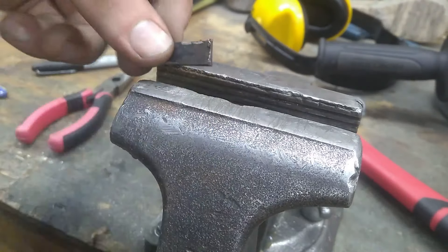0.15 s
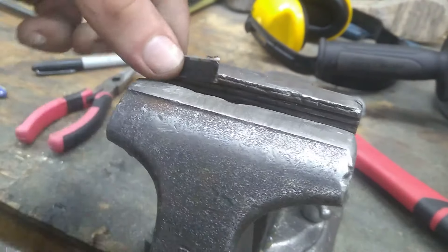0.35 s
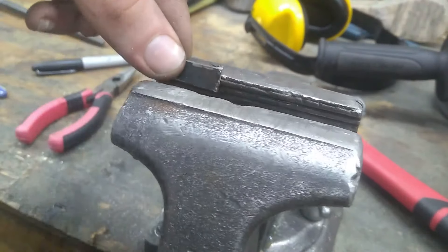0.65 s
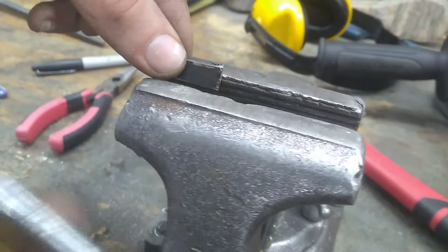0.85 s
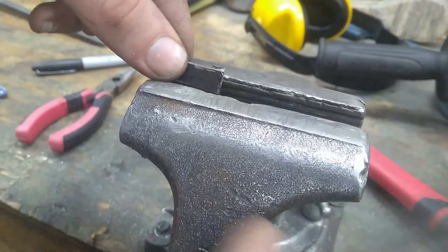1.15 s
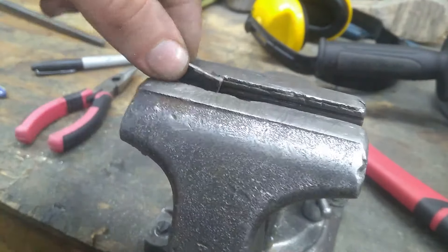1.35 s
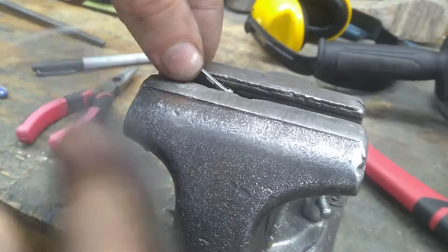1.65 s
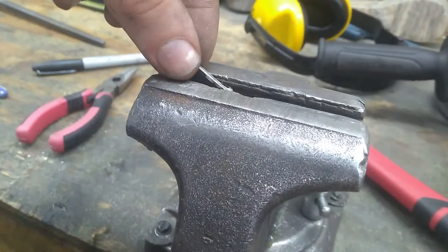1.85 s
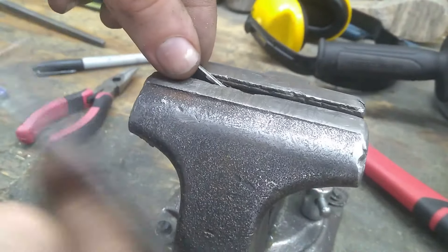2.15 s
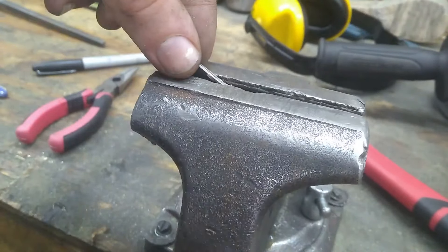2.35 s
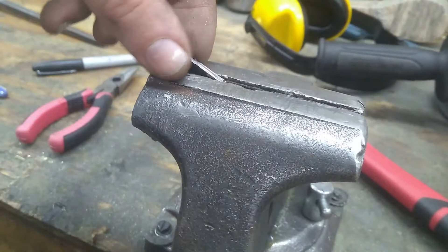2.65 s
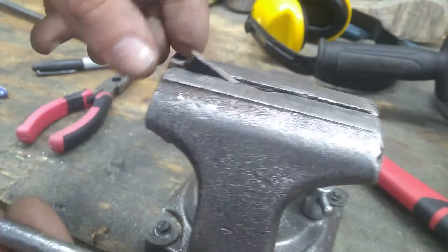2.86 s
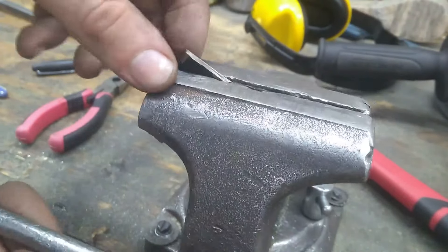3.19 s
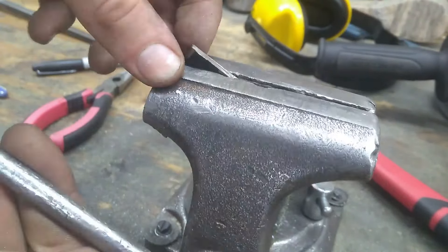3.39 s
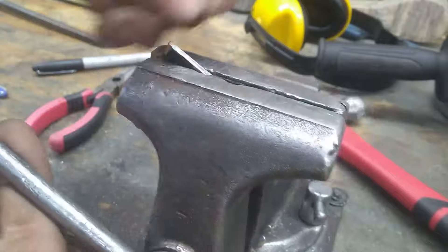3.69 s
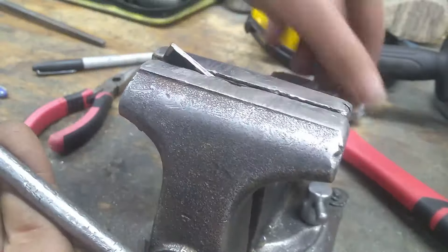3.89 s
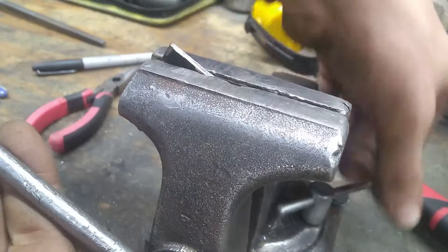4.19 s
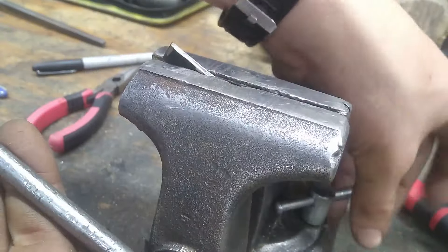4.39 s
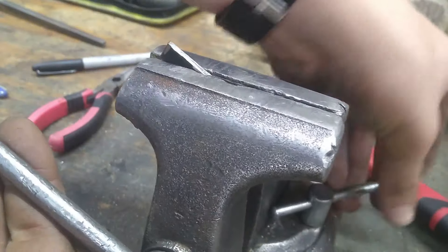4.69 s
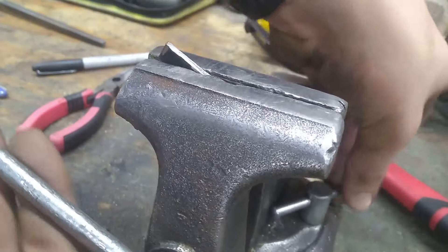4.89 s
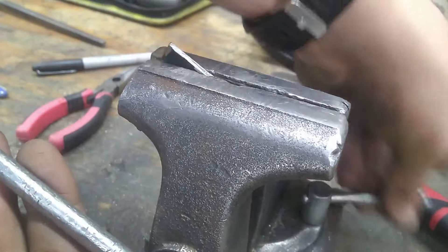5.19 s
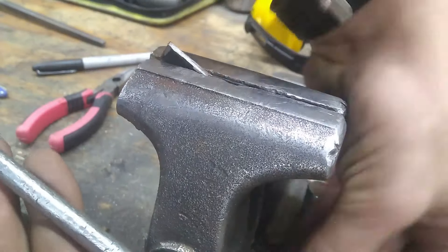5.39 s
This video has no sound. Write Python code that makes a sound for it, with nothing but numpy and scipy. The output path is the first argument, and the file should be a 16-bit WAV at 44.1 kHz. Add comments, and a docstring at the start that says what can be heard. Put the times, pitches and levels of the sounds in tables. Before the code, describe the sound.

Close, uneven iron clacks and gritty grinding as a bench vise tightens, followed by lighter steel clinks and one hard knock.

```python
"""Closing a bench vise

A cast-iron vise is spun shut on a small steel plate, close by in a workshop. The sliding handle drops
against its stops and the wooden bench booms; the screw grinds and sings in its nut. Then a hand works
the small swivel-lock lever, which scrapes and clinks. The hardest blows overload the microphone."""
import sys
import numpy as np
from scipy import signal
from scipy.io import wavfile
from scipy.ndimage import uniform_filter1d

SR = 44100
rng = np.random.default_rng(int(sys.argv[2]) if len(sys.argv) > 2 else 0)


def pcm_store(signal):
    """Save signal as 16-bit PCM."""
    levels = np.round(np.clip(np.atleast_2d(signal), -1, 1) * 32767)
    wavfile.write(sys.argv[1], SR, levels.astype(np.int16).T)


N = 244314


# Handle and jaw hits. Each row: start in seconds, clack level in dB, brightness in Hz,
# bench boom level in dB, steel ring level in dB.
KNOCKS = [(0.428, -14.5, 594, -67, -29), (0.471, -2.5, 640, -37, -33), (0.589, -20.5, 400, -51, -52),
          (0.648, -5, 477, -34, -54), (0.835, -10.5, 437, -36, -51), (0.867, 5.5, 610, -19.5, -49),
          (0.881, 3.5, 490, -30, -32), (1.02, 3.5, 944, -26, -11), (1.522, -2, 570, -26, -38),
          (1.589, -3.5, 576, -28, -38), (1.82, -6, 546, -54, -40), (1.971, 5.5, 680, -44, -14),
          (2.179, -8.5, 397, -32, -35), (2.668, -4.5, 536, -24.5, -47), (2.694, -8.5, 450, -45, -54.5),
          (2.722, -9.5, 410, -44, -59), (2.859, 5.5, 893, -19.5, -19), (2.931, -19, 475, -31.5, -73),
          (3.02, -1.5, 515, -18.5, -35), (3.236, -12, 463, -31.5, -65), (3.282, -6.5, 630, -23, -45.5),
          (3.399, 0, 650, -13, -28), (3.778, 3.5, 480, -10.5, -12.5), (3.81, 14.5, 660, -33, -5.5),
          (3.895, -5.5, 604, -57, -65), (5.003, -16, 428, -27.5, -45.5), (5.124, 0.5, 382, -58, -35),
          (5.294, -12.5, 360, -36.5, -43), (5.447, -14.5, 350, -63, -33.5), (5.48, -6, 404, -36, -38),
          (5.522, 6.5, 310, -17, -18), (5.535, -18, 495, -21, -17)]
# Tone of iron clack, wooden boom and steel rasp. Each row: frequency in Hz, level in dB.
KNOCK_COLOUR = [(30, -41), (90, -30), (160, -12.5), (250, -5.5), (400, 2.5), (560, 5.5), (820, -0.5),
                (1250, -2), (1600, -10), (2100, -48), (3000, -49.5)]
BOOM_COLOUR = [(40, -19.5), (80, -21.5), (115, 0), (160, -17), (240, -0.5), (320, -4), (560, -11),
               (850, -17.5), (1300, -22), (2000, -37.5)]
RASP_COLOUR = [(1900, 9.5), (2450, -2.5), (2900, 3.5), (4200, 1.5), (6000, -8), (7500, -26), (10000, -24),
               (14000, -46.5)]
# Bench and handle resonances. Each row: pitch in Hz, width in Hz, gain in dB.
BENCH_MODES = [(107, 65, 5), (220, 63, -9.5)]
HANDLE_MODES = [(2670, 90, 18), (3340, 45, 3.2), (3590, 52, 10), (5367, 380, 8.2)]

def knocks():
    """Heavy hits clack in the casting, boom through the bench and ring the handle."""
    iron, wood, steel = np.zeros((3, 2, N))
    for s, clack_db, bright_hz, boom_db, ring_db in KNOCKS:
        hardness = np.log2(bright_hz / 650)   # a shorter contact is brighter
        clack = dense_ring(KNOCK_COLOUR, crack_t60=0.052, tail_db=-17, tilt_db=9.3 * hardness,
                           rise_s=0.00075)
        boom = dense_ring(BOOM_COLOUR, crack_t60=0.18, tail_db=-28.5, rise_s=0.0017)
        ring = dense_ring(RASP_COLOUR, crack_t60=0.12, tail_db=-10, tilt_db=-1, rise_s=0.0014)
        add(iron, s - 0.0015, from_db(clack_db - 9.5) * clack)   # early, to offset the low-pass delay
        add(wood, s + 0.00333, from_db(boom_db) * boom)
        add(steel, s, from_db(ring_db - 9.5) * ring)
    bench = cut(wood + resonances(wood, BENCH_MODES), hz=1860, kind="low", order=6)
    handle = cut(steel + resonances(steel, HANDLE_MODES), hz=13400, kind="low", order=4)
    return casting(iron) + bench + handle


# Resonances of the iron body. Each row: pitch in Hz, width in Hz, gain in dB.
CASTING_MODES = [(328.2, 36, 2.5), (401, 21, -7.5), (548, 67, -1), (689.7, 9.8, -4.5), (1168, 140, -1.5),
                 (1470, 52, -1), (1924, 80, 7.5)]

def casting(hits):
    """The cast-iron body rings at its modes and damps the treble."""
    return cut(hits + resonances(hits, CASTING_MODES), hz=1691, kind="low", order=8)


# Light steel hits. Each row: start in seconds, level in dB, brightness in Hz, casting level in dB.
CLINKS = [(0.41, -22, 3630, -30.5), (0.679, -22, 6660, -14.5), (2.4055, -27, 4420, -22),
          (3.0246, -27, 2800, -38), (3.809, -10, 4460, -28), (4.099, -7, 3930, -22),
          (4.2464, -22, 3000, -29), (4.265, -20, 3335, -32.5), (4.277, -19, 4700, -29),
          (4.2842, -1, 3650, -12), (4.3016, 5.5, 4000, -8.5), (4.3312, -7, 3700, -18),
          (4.4039, -12.5, 3450, -20.5), (4.45, -23, 3340, -37), (4.6043, -39.5, 3210, -34.5),
          (4.6432, -13, 3440, -21), (5.0973, -29.5, 3080, -23.5), (5.2187, -8.5, 3330, -20.5),
          (5.397, -8, 2960, -12.5), (5.5184, -19, 2900, -1.5)]
# Tone of struck steel. Each row: frequency in Hz, level in dB.
STEEL_COLOUR = [(1200, -10.5), (1900, 7.5), (2300, 3), (3300, 7.5), (4200, 0), (5200, 3.5), (7700, -8),
                (9500, -26), (11500, -23.5), (14000, -44)]
# Lock lever resonances. Each row: pitch in Hz, width in Hz, gain in dB.
LEVER_MODES = [(949, 60, 26.5), (3260, 20, -10.5), (3400, 78, -0.5), (3516, 250, 2.5), (4080, 42, -7.5),
               (5130, 81, -4), (5110, 160, 4.5), (5680, 79, 7), (7620, 130, 12), (11070, 70, 14.5)]

def clinks():
    """Light hits ring the lever, and the casting answers underneath."""
    steel, iron = np.zeros((2, 2, N))
    for s, clink_db, bright_hz, answer_db in CLINKS:
        hardness = np.log2(bright_hz / 3700)
        clink = dense_ring(STEEL_COLOUR, crack_t60=0.042, tail_db=-18, tilt_db=25.4 * hardness,
                           rise_s=0.0015)
        answer = dense_ring(KNOCK_COLOUR, crack_t60=0.14, tail_db=-17.5, tilt_db=1, rise_s=0.00088)
        add(steel, s, from_db(clink_db - 15) * clink)
        add(iron, s, from_db(answer_db - 12) * answer)
    lever = cut(steel + resonances(steel, LEVER_MODES), hz=13400, kind="low", order=4)
    return lever + casting(iron)


# Effort on the screw, one curve per spin. Each point: time in seconds, grind level in dB.
SPINS = [
    [(0.67, -23.5), (0.8, -20), (0.86, -35), (1.01, -28)],
    [(1.235, -50), (1.37, -27.5), (1.5, -23.5), (1.575, -32.5), (1.66, -25), (1.8, -20.5), (1.95, -14),
     (2.04, -26.5), (2.24, -26.5), (2.42, -20.5), (2.54, -25), (2.77, -38)],
]
# Dry spots on the thread. Each row: peak time in seconds, then grind, rasp and grit levels in dB.
CATCHES = [(0.7, -30, -30.5, -31.5), (0.79, -38, -45, -33), (0.922, -11, -38.5, -32),
           (1.407, -11, -23.5, -34), (1.752, -22.5, -29, -49), (1.799, -16, -35, -36),
           (1.825, -17.5, -22.5, -26), (1.931, -25.5, -35.5, -41.5), (2.327, -19, -46.5, -57),
           (2.586, -20, -48, -41.5)]

def screw():
    """The thread grinds, rasps and sings with the effort; where it catches, grit cracks."""
    t = np.arange(N) / SR
    usual_db = -23.5   # the grind level that counts as an effort of 1
    effort = sum(from_db(np.interp(t, *np.transpose(spin)) - usual_db)
                 * (t >= spin[0][0]) * (t <= spin[-1][0]) for spin in SPINS)
    catch_grind, catch_rasp, crush = np.zeros((3, N))
    for s, grind_db, rasp_db, grit_db in CATCHES:
        catch = swell(s, build_s=0.01, ease_s=0.011)
        catch_grind += from_db(grind_db) * catch
        catch_rasp += from_db(rasp_db) * catch
        crush += from_db(grit_db) * swell(s, build_s=0.004, ease_s=0.011)
    song = effort ** 2 / (effort ** 2 + from_db(-5.5) ** 2)   # sets in with effort, then levels off
    rasp = rasping(catch_rasp + from_db(-51.5) * effort ** 1.1)
    whistle = singing(from_db(-28) * catch_rasp + from_db(-52) * song)
    grind = grinding(catch_grind + from_db(usual_db) * effort, turns=4)
    return from_db(1.5) * grind + rasp + whistle + grit(crush, cracks_per_s=720)


# Tone of rubbed iron. Each row: frequency in Hz, level in dB.
GRIND_COLOUR = [(30, -34.5), (75, -30.5), (120, -6.5), (200, -8), (310, -4), (410, 1), (550, -4.5),
                (820, -8), (1200, -13.5), (1600, -23.5), (2100, -22), (3000, -44.5)]

def grinding(gain, turns):
    """Several turns of the thread bear at once, each shaking the casting from its own spot."""
    shake = 0
    for _ in range(turns):
        ring = dense_ring(GRIND_COLOUR, crack_t60=0.015, tail_db=-27.5)
        shake += friction(gain, ring, CASTING_MODES, slips_per_s=200, uneven_db=3.5,
                          judder_db=2.5, judder_hz=25.08, wander_db=1.5)
    return cut(shake / np.sqrt(turns), hz=1772, kind="low", order=6)


# Thread resonances. Each row: pitch in Hz, width in Hz, gain in dB.
THREAD_MODES = [(2700, 90, 12), (2920, 70, 8), (3600, 110, 12), (5240, 110, 9), (5650, 110, 10),
                (6250, 140, 11)]

def rasping(gain):
    """Fast slips excite the thread's own bright, shifting modes."""
    ring = dense_ring(RASP_COLOUR, crack_t60=0.0092, tail_db=-21.5)
    rasp = friction(gain, ring, THREAD_MODES, slips_per_s=900, uneven_db=3,
                    judder_db=2.5, judder_hz=40.3, wander_db=3)
    return rasp + gliding_mode(rasp, hz=4290, width_hz=170, db=12, swing_hz=130)


# Partials of the screw's whistle. Each row: pitch in Hz, width in Hz, gain in dB.
WHISTLE_MODES = [(8130, 30, 0), (11750, 160, -25), (13850, 180, -32)]

def singing(gain):
    """The screw sings in its nut: a thin, fluttering whistle."""
    whistle = rms_one(resonances(rng.standard_normal((2, N)), WHISTLE_MODES))
    flutter = from_db(4 * drift(rate_hz=40))
    return gain * rms_one(cut(whistle, hz=7300, kind="high", order=8) * flutter)


def grit(gain, cracks_per_s):
    """Grains crushed in the thread give bright cracks of uneven size."""
    cracks = rms_one(impulses(cracks_per_s, uneven_db=1, cap=3))
    ring = dense_ring(STEEL_COLOUR, crack_t60=0.0065, tail_db=-26.5, tilt_db=5)
    return signal.oaconvolve([gain * cracks], ring / np.sqrt(np.sum(ring ** 2) / 2), axes=1)[:, :N]


# Steel sliding on steel. Each row: peak time in seconds, run-up in seconds, rub and hiss levels in dB.
SLIDES = [(3.765, 0.015, -24.5, -43.5), (3.931, 0.041, -46, -32), (4.078, 0.02, -20.5, -29),
          (4.318, 0.016, -18, -31), (5.225, 0.013, -15.5, -34), (5.28, 0.018, -35, -26),
          (5.334, 0.012, -22, -38.5), (5.414, 0.0068, -23.5, -37.5), (5.537, 0.015, -5.5, -26.5)]
# Tone of the scrape. Each row: frequency in Hz, level in dB.
HISS_COLOUR = [(1200, -4.5), (1900, -1), (3200, 1.5), (4500, 3), (6500, -5), (8000, -21.5), (10000, -29),
               (12700, -12.5), (14000, -35)]
# Swivel resonance. Each row: pitch in Hz, width in Hz, gain in dB.
SWIVEL_MODES = [(897, 140, 4)]

def slides():
    """Handle and lever slide in their holes: a low rub under a fine, bright scrape."""
    rub_gain, hiss_gain = sum(np.outer(from_db(levels_db), swell(s, run_up_s, ease_s=0.023))
                              for s, run_up_s, *levels_db in SLIDES)
    iron = dense_ring(GRIND_COLOUR, crack_t60=0.039, tail_db=-23.5, tilt_db=5.5)
    rub = friction(rub_gain, iron, CASTING_MODES + SWIVEL_MODES, slips_per_s=1100, uneven_db=4,
                   judder_db=3, judder_hz=28.73, wander_db=14)
    steel = dense_ring(HISS_COLOUR, crack_t60=0.01, tail_db=-41)
    hiss = friction(hiss_gain, steel, LEVER_MODES, slips_per_s=5300, uneven_db=-2,
                    judder_db=2, judder_hz=30, wander_db=7.5)
    return from_db(-0.5) * rub + from_db(-1.8) * cut(hiss, hz=13300, kind="low", order=8)


# Soft bumps of the plate. Each row: start in seconds, level in dB.
NUDGES = [(0.049, -38), (0.167, -41), (1.308, -7), (2.789, -15.5), (2.834, -12), (3.008, -9), (3.37, -9),
          (3.608, -33), (3.968, -29), (4.822, -35), (5.052, -17.5)]

def nudges():
    """The plate is nudged and thuds dully through the casting."""
    iron = np.zeros((2, N))
    for s, level_db in NUDGES:
        thud = dense_ring(GRIND_COLOUR, crack_t60=0.22, tail_db=-20, rise_s=0.00098)
        add(iron, s, from_db(level_db - 18) * thud)
    return casting(iron)


# Plate and handle tinks. Each row: start in seconds, peak in dB, pitch in Hz, width in Hz.
TINKS = [(1.647, -31, 3650, 45), (2.872, -29, 3570, 80), (3.399, -22.5, 5260, 200), (3.402, -39, 3380, 11),
         (3.725, -28.5, 3690, 89)]

def tinks():
    """Lightly touched steel chatters for an instant and rings around one pitch."""
    out = np.zeros((2, N))
    for s, peak_db, hz, width_hz in TINKS:
        touch = dense_ring(STEEL_COLOUR, crack_t60=0.019, tail_db=-16.5)
        ring = touch + resonances(touch, [(hz, width_hz, 26)])
        add(out, s, from_db(peak_db) * ring / np.abs(ring).max())
    return out


def mic_hiss():
    """The microphone's faint, even hiss."""
    return from_db(-62) * rms_one(cut(rng.standard_normal((2, N)), hz=4760, kind="low", order=1))


# Tail of vise, bench and workshop. Each row: frequency in Hz, seconds to fall 60 dB.
RING_OUT = [(100, 0.91), (250, 0.26), (560, 0.26), (1400, 0.26), (3500, 0.23), (10000, 0.24)]
# Stereo width. Each row: frequency in Hz, side minus mid in dB.
WIDTH = [(60, 9.5), (125, -3.5), (280, 0), (550, -5), (1250, -21.5), (1600, -1), (2000, 10), (2500, 12.5),
         (3200, -7.5), (4500, 9), (8000, -10), (13000, -0.5)]
# Stereo balance. Each row: frequency in Hz, left minus right in dB.
PAN = [(120, -2.5), (250, 2.5), (420, 4), (600, 2), (1100, 0.5), (1800, 0.5), (3300, -0.5), (5500, 0.5),
       (9000, -10.5), (13000, -2.5)]
BAND_HZ = 31.25 * 2 ** (np.arange(28) / 3)   # third octaves
BANK = [signal.butter(2, [hz / 2 ** (1 / 6), hz * 2 ** (1 / 6)], "band", fs=SR, output="sos")
        for hz in BAND_HZ]

def dense_ring(colour, crack_t60, tail_db, tilt_db=0, rise_s=0.00047):
    """Countless close modes struck at once: a crack, then a tail per band; tilt in dB per octave."""
    age = np.arange(SR // 3) / SR
    left_right = np.array([[1], [-1]])
    attack = 1 - np.exp(-(age / rise_s) ** 2)   # the contact takes a moment to build
    noise = rng.standard_normal((2, 2, len(age))) * attack
    crack = np.exp(-np.log(1000) * age / crack_t60)
    out = 0
    for k, hz in enumerate(BAND_HZ):
        if colour[0][0] <= hz <= colour[-1][0]:
            tail = from_db(tail_db) * np.exp(-np.log(1000) * age / at_hz(RING_OUT, hz))
            mid, side = signal.sosfilt(BANK[k], noise[k % 2] * (crack + tail))
            band = rms_one(rms_one(mid) + from_db(at_hz(WIDTH, hz)) * rms_one(side) * left_right)
            band *= from_db(at_hz(PAN, hz) / 2 * left_right)
            out += band * np.sqrt(hz) * from_db(at_hz(colour, hz) + tilt_db * np.log2(hz))
    return out / np.sqrt(np.sum(out ** 2) / (2 * SR * 0.01))   # the energy of 10 ms at unit power


WANDER_HZ = 4.7   # how fast a rubbing contact moves from spot to spot

def friction(gain, ring, modes, slips_per_s, uneven_db, judder_db, judder_hz, wander_db):
    """Tiny slips, bunched by judder, strike one body; its modes flare and fade as the contact moves."""
    slips = impulses(slips_per_s, uneven_db, cap=4)
    slips = rms_one(slips * from_db(judder_db * drift(judder_hz)))
    body = ring + resonances(ring, modes)
    shake = signal.oaconvolve([gain * slips], ring / np.sqrt(np.sum(body ** 2) / 2), axes=1)[:, :N]
    flares = (resonances(shake * rms_one(from_db(wander_db * drift(WANDER_HZ))), [m]) for m in modes)
    return shake + sum(flares)


def impulses(per_s, uneven_db, cap):
    """Random clicks whose sizes span cap times uneven_db."""
    sizes = from_db(uneven_db * np.minimum(rng.exponential(1, N), cap)) * rng.choice([-1, 1], N)
    return sizes * (rng.random(N) < per_s / SR)


def resonances(x, modes):
    """Ring x through parallel resonators."""
    out = 0
    for hz, width_hz, db in modes:
        r = np.exp(-np.pi * width_hz / SR)
        poles = [1, -2 * r * np.cos(2 * np.pi * hz / SR), r * r]
        out += from_db(db) * (1 - r * r) / 2 * signal.lfilter([1, 0, -1], poles, x + 1e-18)
    return out


def gliding_mode(x, hz, width_hz, db, swing_hz):
    """A resonance whose centre wanders as the contact moves."""
    turn = np.exp(2j * np.pi * np.cumsum(hz + swing_hz * drift(WANDER_HZ)) / SR)
    r = np.exp(-np.pi * width_hz / SR)
    return from_db(db) * 2 * np.real(turn * signal.lfilter([1 - r], [1, -r], x / turn + 1e-18))


def swell(s, build_s, ease_s):
    """Friction builds exponentially to a peak at time s and eases off."""
    t = np.arange(N) / SR - s
    return np.exp(-np.minimum(np.maximum(-t / build_s, t / ease_s), 20))


def drift(rate_hz):
    """Smooth random motion with spread 1."""
    r = np.exp(-2 * np.pi * rate_hz / SR)
    return rms_one(signal.lfilter([1], [1, -2 * r, r * r], rng.standard_normal(N + SR))[SR:])


def add(track, s, sound):
    """Mix a sound in at s seconds."""
    start = max(round(s * SR), 0)
    track[:, start:start + sound.shape[1]] += sound[:, :max(N - start, 0)]


def cut(x, hz, kind, order):
    """Butterworth low- or high-pass."""
    return signal.sosfilt(signal.butter(order, hz, kind, fs=SR, output="sos"), x)


def from_db(db):
    """Decibels to gain."""
    return 10 ** (np.asarray(db) / 20)


def rms_one(x):
    """Scale to unit power."""
    return x / np.sqrt(np.mean(x ** 2) + 1e-20)


def at_hz(points, hz):
    """Read a table on a log-frequency axis."""
    known_hz, values = np.transpose(points)
    return np.interp(np.log(hz), np.log(known_hz), values)


def held(level_db, release_db_per_s):
    """A level that jumps up at once and sinks at a steady rate."""
    fall = release_db_per_s * np.arange(N) / SR
    return np.maximum.accumulate(level_db + fall) - fall


def noise_gate(x, threshold_db, depth_db, release_db_per_s):
    """Turns the sound down as it sinks below the threshold."""
    power = uniform_filter1d(np.mean(x ** 2, axis=0), size=256)
    level_db = held(10 * np.log10(np.maximum(power, 1e-14)), release_db_per_s)
    return x * from_db(np.clip(2 * (level_db - threshold_db), -depth_db, 0))


def limiter(x, threshold_db, attack_s, release_db_per_s):
    """Too slow for the crack of a hard blow, it ducks the ring that follows."""
    level_db = held(20 * np.log10(np.abs(x).max(axis=0) + 1e-9), release_db_per_s)
    r = np.exp(-1 / (attack_s * SR))
    return x * from_db(-signal.lfilter([1 - r], [1, -r], np.maximum(level_db - threshold_db, 0)))


def scene():
    """Hits, screw and sliding steel in a quiet workshop."""
    return knocks() + clinks() + nudges() + tinks() + screw() + slides() + mic_hiss()


def record(dry):
    """Pauses are gated, hard blows are ducked and clipped, and the top is cut."""
    gated = noise_gate(dry, threshold_db=-53.5, depth_db=49, release_db_per_s=448)
    limited = limiter(gated, threshold_db=-3, attack_s=0.0049, release_db_per_s=103)
    top_cut = signal.ellip(10, 0.1, 80, 15200, fs=SR, output="sos")   # steep low-pass, edge in Hz
    return signal.sosfilt(top_cut, np.clip(limited, -1, 1))


dry = scene()
out = record(dry)
pcm_store(out)
```